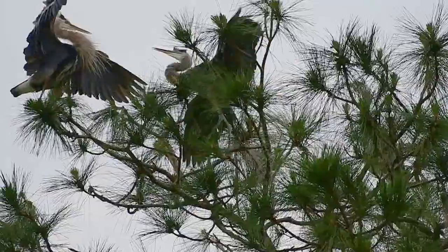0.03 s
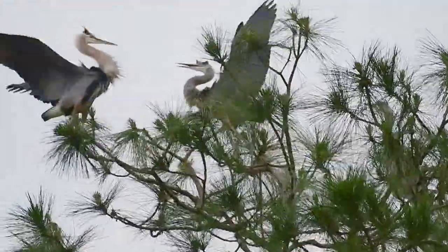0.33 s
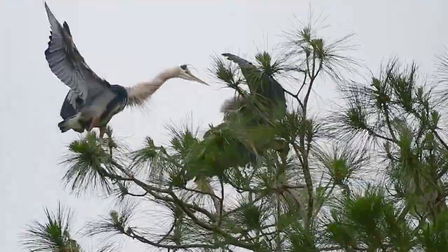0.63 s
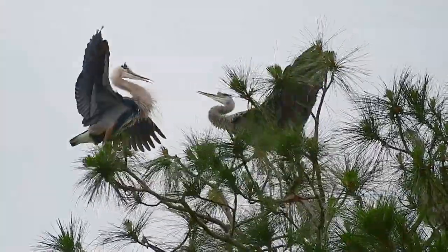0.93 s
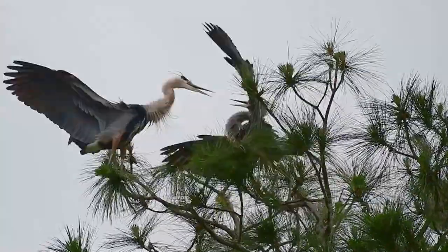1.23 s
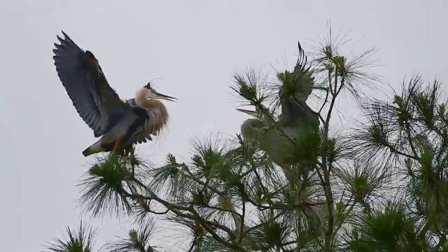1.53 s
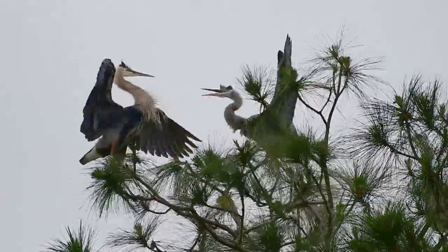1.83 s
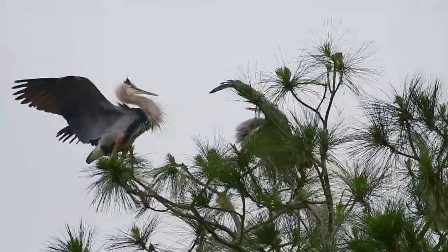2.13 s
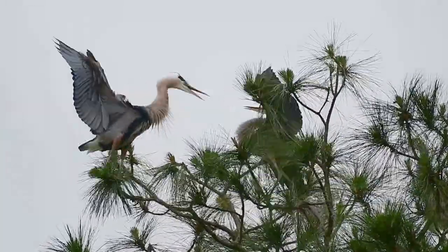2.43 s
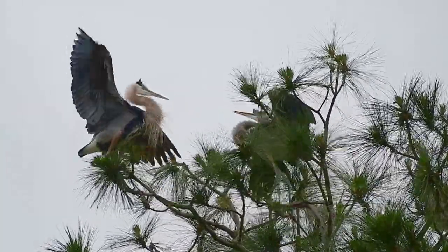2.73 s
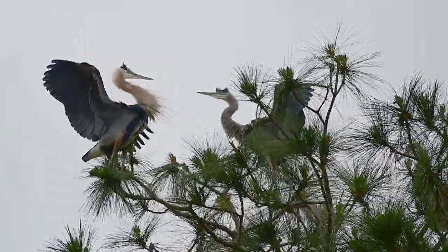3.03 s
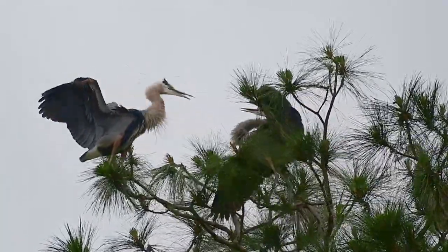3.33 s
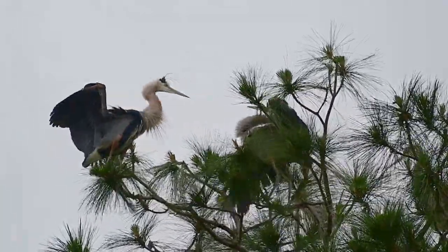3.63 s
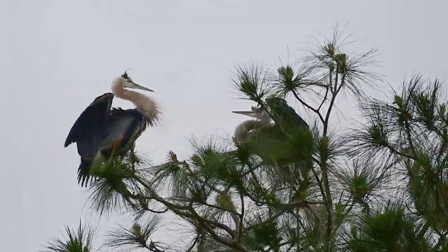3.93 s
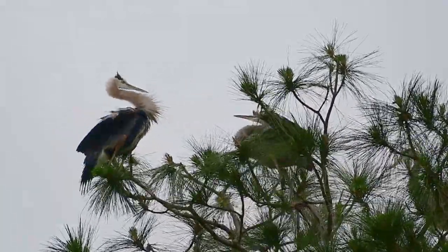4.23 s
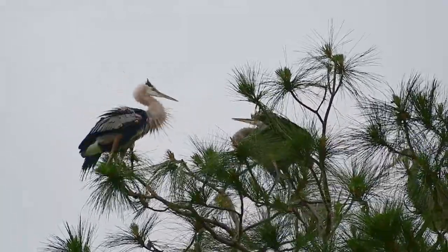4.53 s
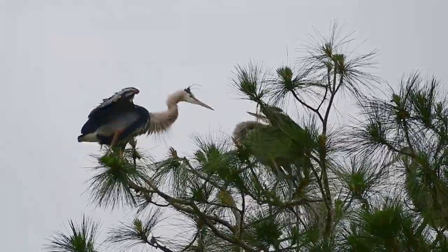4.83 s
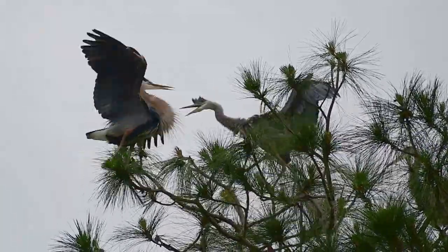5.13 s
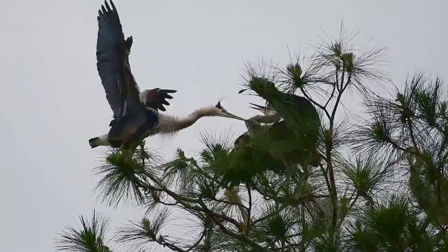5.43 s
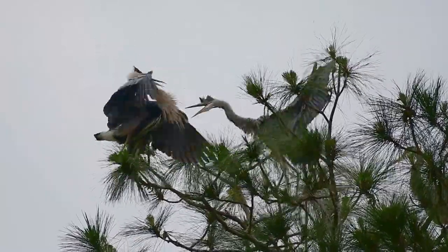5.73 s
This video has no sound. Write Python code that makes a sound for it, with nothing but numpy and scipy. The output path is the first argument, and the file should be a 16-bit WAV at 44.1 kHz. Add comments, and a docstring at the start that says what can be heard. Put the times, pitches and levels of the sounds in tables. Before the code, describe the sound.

Outdoors among trees, distant wind rumbles steadily and insects hiss faintly. Slightly right of the microphone, two herons trade very short, harsh calls with gaps between them: one shrill squawk, a string of raspy croaks with occasional clucks and bill snaps, then two louder squawks near the end. Each call leaves a short woodland echo. Small birds whistle softly in the distance, with a thin trill and a repeated phrase in the second half.

```python
"""Two herons squabble at the top of a pine, their calls pulses of the syrinx shaped by the long neck.
The echo of a croak comes first, then a shrill squawk, then hoarse croaks, short clucks and bill snaps,
each thrown back by the wood. After a second, songbirds whistle far off; midway a high trill swells,
one bird repeats a phrase and another a rising note. Two more squawks end the quarrel.
Throughout, distant wind rumbles and insects hiss in the trees over faint microphone noise."""
import sys
import numpy as np
from scipy import signal
from scipy.fft import rfft, irfft
from scipy.io import wavfile
from scipy.ndimage import uniform_filter1d

SR = 44100
rng = np.random.default_rng(int(sys.argv[2]) if len(sys.argv) > 2 else 0)


def wav_record(signal):
    """Record a signal, one row per channel, as 16-bit PCM in the file named by sys.argv[1]."""
    frames = np.transpose(np.atleast_2d(signal))
    bounded = np.clip(frames, -1, 1)
    # unit amplitude maps onto the largest positive 16-bit level
    quanta = np.round(bounded * 32767).astype(np.int16)
    wavfile.write(sys.argv[1], SR, quanta)


N = 264600
RING_HZ, RING_WIDTH_HZ = 975, 76   # main resonance of the stretched neck

# Narrow upper resonances of the neck: f/Hz, bandwidth/Hz, gain/dB
NECK_MODES = [(2236, 110, -6.5), (3780, 50, -10.5)]
# Throat response in a croak: f/Hz, gain/dB
CROAK_THROAT = [(200, -27.5), (510, 3), (770, -4.5), (920, 4), (1250, 5), (1800, -1), (2250, 2), (2650, -3),
                (3700, 3), (4400, -4), (6300, -7), (8500, -18), (11300, -22), (15500, -44)]
# Croaks: t/s, duration/s, peak level/dB, fraction of the duration spent swelling, ring offset/dB
CROAKS = [(0.002, 0.052, -32.5, 0.4, -0.5), (0.702, 0.13, -27, 0.55, -3.5), (1.416, 0.11, -26, 0.88, -3),
          (2.596, 0.11, -28.5, 0.74, -4), (3.596, 0.056, -36.5, 0.9, -0.5), (4.801, 0.11, -28, 0.29, -1),
          (5.443, 0.13, -34, 0.86, -7)]
def croaks(pitch_hz=496, puff=1.25, puff_s=0.001, breath=0.69, ring_db=19, shut_ring_db=8,
           shut_hz=3800, leak_db=-19, attack_s=0.0085, release_s=0.0053, sputter_db=1.8):
    """Source and filter: raspy pulses drive the throat; the opening beak lowers its ring, frees treble."""
    out = np.zeros(N)
    for s, length, db, swell, ring_offset_db in CROAKS:
        t = clock(length)
        effort_db = db + 25   # relative to a full-strength croak
        opening_s = 0.057 * 2 ** (effort_db / 4.5)
        bright_hz = 12000 * 2 ** (effort_db / 12.5)
        opened = np.clip(t / opening_s, 0, 1) ** 5
        slaps = syrinx(np.full(len(t), pitch_hz), rough=0.045, uneven_db=2.5, jitter=0.11)
        flow = np.sqrt(signal.lfilter([1], [1, -np.exp(-2 / (puff_s * SR))], slaps ** 2))
        rasp = puff * unit_rms(flow * rng.standard_normal(len(t)))
        source = slaps + rasp + breath * rng.standard_normal(len(t))
        shut_ring = (1 - opened) * from_db(shut_ring_db) * neck(source, hz=1090, width_hz=97)
        # stretched, the neck resonates at the second harmonic of the slaps
        open_ring = opened * from_db(ring_db + ring_offset_db) * neck(slaps, RING_HZ, RING_WIDTH_HZ)
        upper = sum(from_db(gain_db) * neck(source, hz, width) for hz, width, gain_db in NECK_MODES)
        voice = colour(low_pass(source + shut_ring + open_ring + upper, bright_hz), CROAK_THROAT)
        openness = np.clip(opened + from_db(leak_db), 0, 1)
        voice = np.sqrt(1 - openness) * low_pass(voice, shut_hz, order=4) + openness * voice
        voice /= np.sqrt(uniform_filter1d(voice ** 2, size=900) + 1e-9)   # unit power over 20 ms
        peak_s = np.clip(swell, .05, .95) * length
        level_db = np.interp(t, [0, peak_s, length], [-36, db, db - 4])
        level_db += sputter_db * drift(190.4, len(t))
        edges = np.minimum(t / attack_s, 1) * np.exp(-np.maximum(t - length, 0) / release_s)
        add(out, s, voice * edges * from_db(level_db))
    return out


def syrinx(hz, rough, uneven_db, jitter=0):
    """A valve slaps shut once a cycle; roughness scatters the periods, jitter displaces single slaps."""
    period_noise, size_noise, timing_noise = rng.standard_normal((3, 512))
    cycles = np.cumsum(np.exp(rough * period_noise - rough ** 2 / 2)) + jitter * timing_noise
    samples = np.arange(len(hz))
    at = np.interp(cycles - cycles[0], np.cumsum(hz) / SR, samples, right=-1)
    sizes = from_db(uneven_db * np.clip(size_noise, -2, 2))
    inside = at >= 0
    return unit_rms(sizes[inside] @ np.sinc(samples - at[inside, None]))


def neck(x, hz, width_hz):
    """Air-column resonance: one mode of the neck, with unit gain at its peak."""
    return signal.lfilter(*signal.iirpeak(hz, hz / width_hz, fs=SR), x)


# Squawks: t/s, swell/s, fade/s, peak level/dB, f/Hz, glide/(Hz/s), roughness,
# rattle rate/Hz (1 = no rattle), low-pass cutoff before the fade/Hz
SQUAWKS = [(0.3717, 0.0017, 0.048, -22, 1511, -2300, 0.21, 117.5, 1870),
           (5.222, 0.054, 0.025, -22, 1271, -2200, 0.31, 87.5, 5600),
           (5.8347, 0.052, 0.032, -21, 1423, 1403, 0.17, 1, 3430)]
def squawks(yelp_s=0.0058, yelp_db=-25, swell_db=5.5, fade_db=9.5, locked_hz=947):
    """A clean yelp and rough swell, if time allows; the fade rattles or locks to the neck's resonance."""
    out = np.zeros(N)
    for s, swell_s, fade_s, db, hz, glide, rough, rattle_hz, bright_hz in SQUAWKS:
        if swell_s > yelp_s:
            yelp = shriek(yelp_s, hz=1670, glide=0, rough=0.049, bright_hz=bright_hz)
            add(out, s, from_db(yelp_db) * yelp)
            rise_s = swell_s - yelp_s
            rise = from_db(db + np.interp(clock(rise_s), [0, rise_s], [-swell_db, 0]))
            add(out, s + yelp_s, rise * shriek(rise_s, hz, glide, rough, bright_hz))
        open_hz = 1.75 * bright_hz   # brighter with the beak wide open
        if rattle_hz > 1:
            ending = shriek(fade_s, hz + glide * swell_s, glide, rough, open_hz, rattle_hz)
        else:
            ending = shriek(fade_s, locked_hz, glide=0, rough=0.044, bright_hz=open_hz)
        fade = from_db(db - fade_db * (clock(fade_s) / fade_s) ** 2)
        add(out, s + swell_s, ending * fade)
    return out


# Throat response in a squawk or cluck: f/Hz, gain/dB
SQUAWK_THROAT = [(200, -13), (780, -8.5), (960, -0.5), (1550, 3.5), (1950, 0), (2400, 2), (2880, 1),
                 (3250, -2), (5000, -7), (6500, -13), (8500, -21), (11300, -30.5), (15500, -56)]
def shriek(length, hz, glide, rough, bright_hz, rattle_hz=0, breath=0.24, duty=0.52, shut_db=-15):
    """Aperiodic pulses give a harsh, high voice; amplitude modulation can chop it into a rattle."""
    t = clock(length)
    slaps = syrinx(hz + glide * t, rough, uneven_db=8 * rough)
    source = low_pass(slaps - slaps.mean() + breath * rng.standard_normal(len(t)), bright_hz)
    beak_hiss = 0.38 * np.diff(rng.standard_normal(len(t) + 1))
    gate = np.where(t * rattle_hz % 1 < duty, 1, from_db(shut_db)) * (t < length)
    voice = colour((source + beak_hiss) * gate, SQUAWK_THROAT)
    return unit_rms(voice) * np.sqrt(np.mean(gate ** 2))


# Clucks: t/s, duration/s, level/dB, pulse rate/Hz, low-pass cutoff/Hz, ring gain/dB
CLUCKS = [(0.669, 0.011, -39.5, 1003, 3400, 13), (1.245, 0.0043, -41, 990, 3000, -8),
          (1.256, 0.0063, -37.5, 1007, 2800, -10), (1.541, 0.0078, -34, 1010, 6000, -6),
          (3.117, 0.0011, -25, 997, 4440, 16), (3.565, 0.0033, -27.5, 990, 6000, -2),
          (3.661, 0.0082, -35.5, 1010, 6000, -6), (5.445, 0.0063, -22, 1313, 1490, -7)]
def clucks(breath=0.19):
    """Transient excitation: a few pulses knock the neck into free ringing."""
    out = np.zeros(N)
    for s, length, db, pulse_hz, bright_hz, ring_db in CLUCKS:
        t = clock(length)
        gate = np.sqrt(np.maximum(1 - t / length, 0))
        slaps = syrinx(np.full(len(t), pulse_hz), rough=0.11, uneven_db=0.74)
        source = gate * (slaps + breath * rng.standard_normal(len(t)))
        ring = from_db(ring_db) * neck(source, RING_HZ, RING_WIDTH_HZ)
        voice = colour(low_pass(source + ring, bright_hz), SQUAWK_THROAT)
        add(out, s, from_db(db) * unit_rms(voice) * np.sqrt(np.mean(gate ** 2)))
    return out


# Response of the struck bill: f/Hz, gain/dB
BILL = [(300, -2), (1000, 4), (2300, 0), (3600, 9), (6500, -5), (11000, -11), (15500, -34)]
# Bill snaps and twig ticks: t/s, level/dB
SNAPS = [(1.090, -55), (1.4468, -30), (3.116, -41), (3.564, -28.5), (5.2103, -37), (5.812, -46.5)]
def snaps(decay_s=0.0011):
    """Damped impact: a hard contact gives a broadband burst that decays exponentially."""
    out = np.zeros(N)
    fade = np.exp(-clock(0) / decay_s)
    for s, db in SNAPS:
        burst = colour(fade * rng.standard_normal(len(fade)), BILL)
        add(out, s, from_db(db) * unit_rms(burst) * np.sqrt(2 * np.mean(fade ** 2)))
    return out


# Direction of the herons: f/Hz, left minus right level/dB
BEARING = [(700, -1), (1300, 1), (2400, -6.5), (4400, 0), (5600, -5.5), (7000, 0.5), (8500, -7),
           (10700, 8.5), (13000, 5.5)]
def direct_path(x):
    """Interaural level difference places the source a little to the right."""
    return np.array([colour(x, [(hz, side * db / 2) for hz, db in BEARING]) for side in (1, -1)])


# Spectrum of the echoes: f/Hz, relative level/dB
WOOD = [(200, -14), (1000, 0.5), (2500, 4.5), (4000, 2), (6500, 7.5), (12000, -3)]
def wood_echoes(x, t60_s, build_s):
    """Multiple scattering: countless small echoes build up, then decay exponentially."""
    t = np.arange(SR) / SR
    response = diffuse(WOOD, count=SR) * from_db(-60 * t / t60_s) * (1 - np.exp(-t / build_s))
    return signal.fftconvolve(x[None], unit_rms(response) / np.sqrt(SR), axes=1)[:, :N]


# Notes of the phrase: t/s from its start, duration/s, start f/Hz, middle f/Hz, end f/Hz, relative level/dB
PHRASE = [(0, 0.046, 3470, 3750, 3890, -67), (0.079, 0.053, 2220, 2290, 2000, -64.5),
          (0.252, 0.14, 2720, 2400, 3040, -61.5), (0.492, 0.043, 4000, 3530, 3000, -64)]
# Lone whistles: t/s, duration/s, f/Hz, glide/(Hz/s), relative level/dB
WHISTLES = [(1.14, 0.035, 6180, 4494, -62), (2.045, 0.28, 3455, -800, -65), (2.16, 0.11, 2500, -550, -61.5),
            (2.348, 0.052, 3000, -6500, -67), (3.362, 0.071, 5140, 8000, -55), (3.903, 0.23, 3270, -3, -68)]
def songbirds(phrase_start_s=3.132, phrase_every_s=0.565, crescendo_db=2.2,
              rising_start_s=4.203, rising_every_s=0.201):
    """Tonal song: one bird repeats a phrase ever louder, a second a rising note; others whistle once."""
    out = np.zeros(N)
    for k in range(3):
        phrase_s = phrase_start_s + k * phrase_every_s
        for after_s, *shape in PHRASE:
            add(out, phrase_s + after_s, from_db(k * crescendo_db) * whistle(*shape))
        rising = whistle(length=0.065, start_hz=3980, middle_hz=4417, end_hz=4480, db=-63)
        add(out, rising_start_s + k * rising_every_s, rising)
    for s, length, hz, glide, db in WHISTLES:
        add(out, s, whistle(length, hz, hz + glide * length / 2, hz + glide * length, db))
    return out


def whistle(length, start_hz, middle_hz, end_hz, db, waver=0.0093, flicker_db=4.0):
    """Frequency modulation: a pure tone wavers along a parabola through three pitches."""
    progress = np.linspace(0, 1, int(length * SR))
    arc = np.polyfit([0, .5, 1], [start_hz, middle_hz, end_hz], 2)
    hz = np.polyval(arc, progress) * (1 + waver * drift(244, len(progress)))
    swell = np.sqrt(2 * np.abs(np.sin(np.pi * progress)))
    gain = from_db(db + flicker_db * drift(60, len(progress)))
    return swell * gain * np.sin(2 * np.pi * np.cumsum(hz) / SR)


# Wind spectrum: f/Hz, relative density level/dB
WIND = [(15, -50), (25, -44), (40, -13), (65, -4), (105, -4.5), (146, 0.5), (190, -4), (310, -5.5),
        (400, -11.5), (720, -16), (1050, -24), (1350, -25.5), (2100, -35), (4500, -42.5), (9000, -65),
        (14000, -100)]
def wind(db=-38, gust_db=0.58):
    """Low-frequency noise: distant wind rumbles, slightly modulated by gusts."""
    return diffuse(WIND) * from_db(db + gust_db * drift(9, N))


# Insect spectrum: f/Hz, relative density level/dB
INSECTS = [(3500, -39), (4600, -5), (5400, 7.5), (6000, -6), (7000, -13), (9000, -15.5), (14000, -72)]
def insects(db=-66.0, shimmer_db=2.0):
    """Incoherent sum: many insects merge into one shimmering band of noise."""
    return diffuse(INSECTS) * from_db(db + shimmer_db * drift(14, N))


# Trill spectrum: f/Hz, relative density level/dB
TRILL = [(4200, -26), (5100, -3.5), (6200, 2.5), (6900, -4.5), (7800, -37)]
def trill(start_s=2.49, attack_s=0.26, hold_s=0.62, release_s=0.23, rest_db=-76.5, held_db=-62.5):
    """Amplitude-modulated band noise: a distant high trill flickers and swells once."""
    corners_s = np.cumsum([start_s, attack_s, hold_s, release_s])
    level_db = np.interp(np.arange(N) / SR, corners_s, [rest_db, held_db, held_db, rest_db])
    return diffuse(TRILL) * from_db(level_db + 2.0 * drift(45, N))


# Hiss spectrum: f/Hz, relative density level/dB
HISS = [(2000, -11), (5000, 2.5), (11000, 2), (13500, 0.5), (15800, -2), (17000, -25)]
def microphone_hiss(db=-70.0):
    """Self-noise: a steady floor, strongest in the treble."""
    return from_db(db) * diffuse(HISS)


# Likeness of left and right: f/Hz, coherence
COHERENCE = [(60, 0.99), (150, 0.96), (280, 0.95), (500, 0.76), (1000, 0.23), (3000, 0.043), (8000, 0.14),
             (14000, 0.069)]
def diffuse(spectrum, count=N):
    """Diffuse field: stereo noise of unit power, coherent in the bass and unrelated in the treble."""
    hz = np.fft.rfftfreq(count, 1 / SR)
    mid, side = rfft(rng.standard_normal((2, count))) * from_db(at_hz(spectrum, hz))
    coherence = np.clip(at_hz(COHERENCE, hz), 0, .999)
    channels = np.sqrt(1 + coherence) * mid + np.sqrt(1 - coherence) * side * [[1], [-1]]
    return unit_rms(irfft(channels, count))


def colour(x, points, size=8192):
    """Minimum-phase filtering: folding the cepstrum makes the given response causal."""
    cepstrum = irfft(np.log(from_db(at_hz(points, np.fft.rfftfreq(size, 1 / SR)))))
    cepstrum[1:size // 2] *= 2
    cepstrum[size // 2 + 1:] = 0
    response = irfft(np.exp(rfft(cepstrum)))
    return signal.fftconvolve(x, response)[:len(x)]


def low_pass(x, hz, order=2):
    """Attenuation above a cutoff."""
    return signal.sosfilt(signal.butter(order, min(hz, .45 * SR), fs=SR, output="sos"), x)


def at_hz(points, hz):
    """Interpolation on a log-frequency axis."""
    f, value = np.transpose(points)
    return np.interp(np.log(np.maximum(hz, 1)), np.log(f), value)


def drift(rate_hz, count):
    """Random modulation: straight lines between values of unit variance."""
    knots = rng.standard_normal(4096)
    return np.interp(np.arange(count) * rate_hz / SR, np.arange(len(knots)), knots)


def from_db(db):
    """Level to amplitude ratio."""
    return 10 ** (np.asarray(db) / 20)


def unit_rms(x):
    """Normalisation to unit power."""
    return x / np.sqrt(np.mean(x ** 2) + 1e-20)


def clock(length):
    """Time axis of a call, with 12 ms to ring out."""
    return np.arange(int((length + .012) * SR)) / SR


def add(track, s, sound):
    """Superposition of a sound at time s."""
    at = int(s * SR)
    track[at:at + len(sound)] += sound[:N - at]


def scene(branches_db=-15.5, wood_db=-12.0, song_db=-2, song_wood_db=-5.0):
    """Superposition of direct sound, early reflections off branches, reverberation and background."""
    herons = croaks() + squawks() + clucks() + snaps()
    song = songbirds()
    direct = direct_path(herons) + from_db(song_db) * song
    # the first echoes arrive from the sides and widen the image
    early = wood_echoes(herons, t60_s=0.03, build_s=0.001)[0] * [[1], [-1]]
    dull_song = low_pass(song, hz=4800)   # its echoes come from far off
    into_wood = from_db(wood_db) * herons + from_db(song_wood_db) * dull_song
    late = wood_echoes(into_wood, t60_s=0.7, build_s=0.011)
    background = wind() + insects() + trill() + microphone_hiss()
    return direct + from_db(branches_db) * early + late + background


# Treble notches: f/Hz, nominal width/Hz (each of two passes has half this width)
NOTCHES = [(7690, 1680), (9610, 1350)]
def record(dry, start_s=0.068, fade_in_s=0.0044, cutoff_hz=15800):
    """Band rejection and a steep low-pass; an opening silence leaves only the first croak's echo."""
    for hz, width_hz in NOTCHES:
        for _ in range(2):
            dry = signal.lfilter(*signal.iirnotch(hz, 2 * hz / width_hz, fs=SR), dry)
    fade_in = np.clip((np.arange(N) / SR - start_s) / fade_in_s, 0, 1)
    return signal.sosfilt(signal.ellip(12, .1, 80, cutoff_hz, fs=SR, output="sos"), dry * fade_in)


dry = scene()
out = record(dry)
wav_record(out)
```